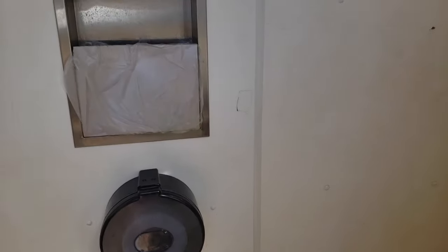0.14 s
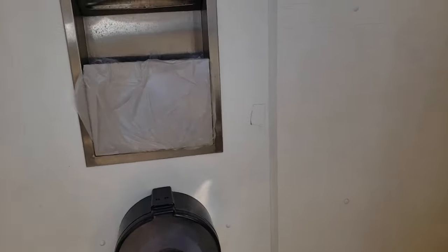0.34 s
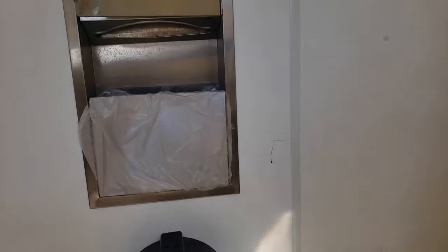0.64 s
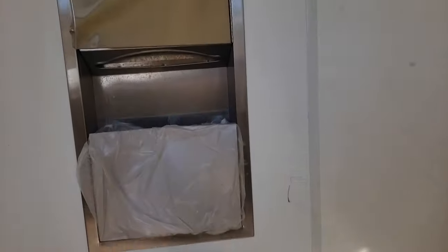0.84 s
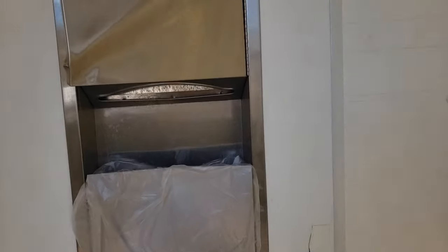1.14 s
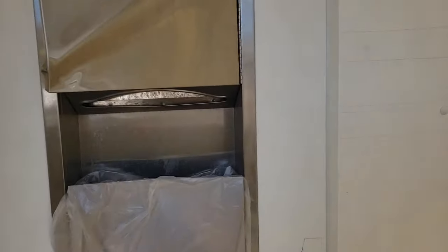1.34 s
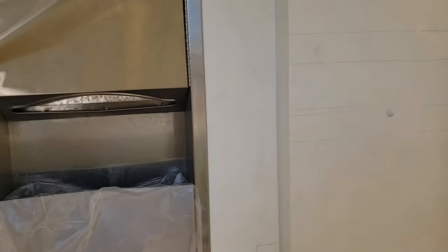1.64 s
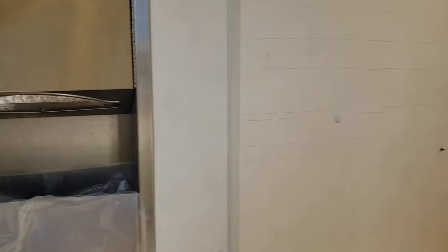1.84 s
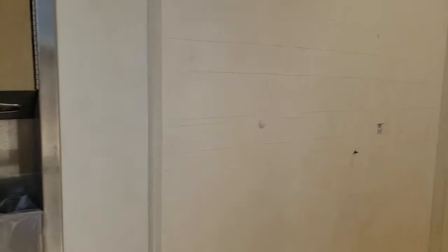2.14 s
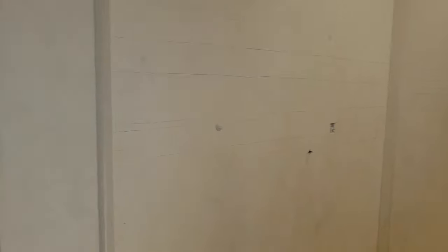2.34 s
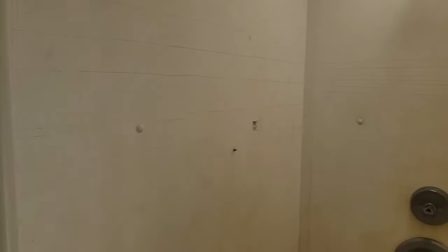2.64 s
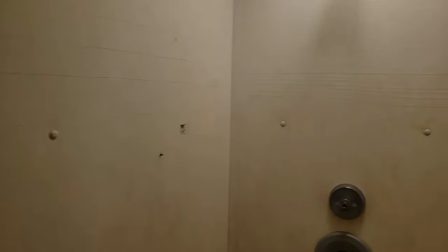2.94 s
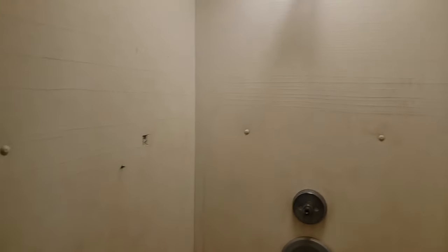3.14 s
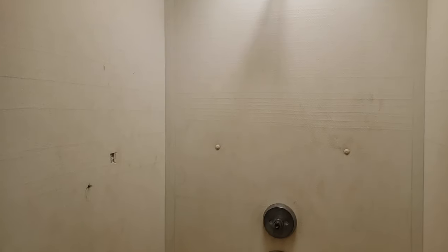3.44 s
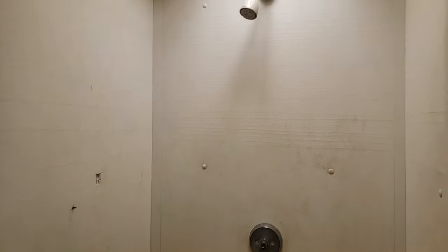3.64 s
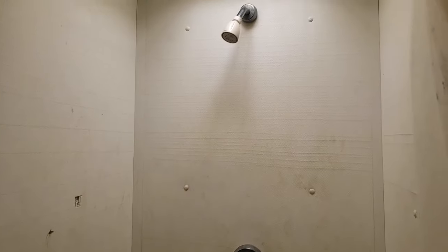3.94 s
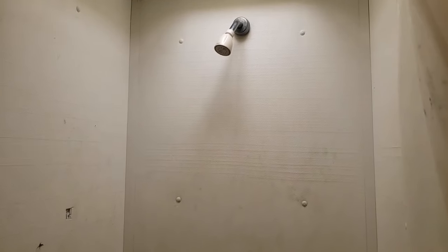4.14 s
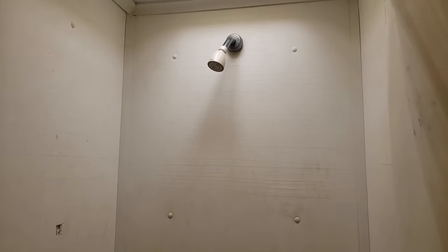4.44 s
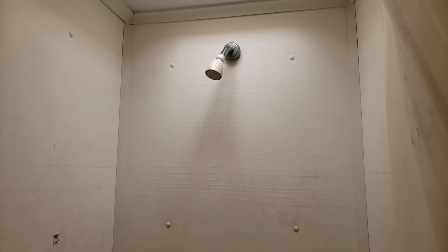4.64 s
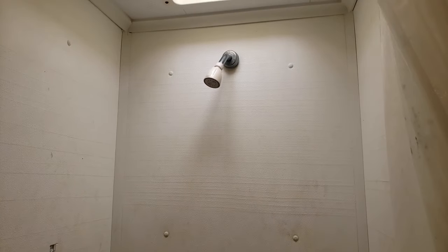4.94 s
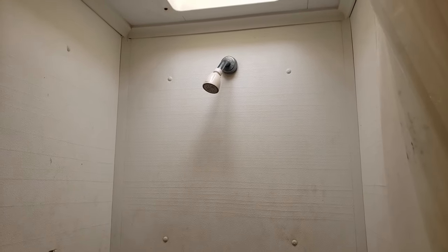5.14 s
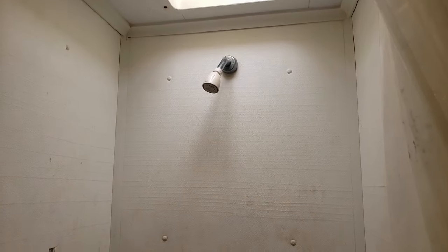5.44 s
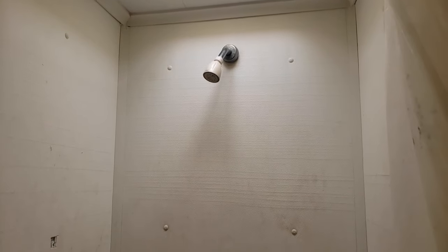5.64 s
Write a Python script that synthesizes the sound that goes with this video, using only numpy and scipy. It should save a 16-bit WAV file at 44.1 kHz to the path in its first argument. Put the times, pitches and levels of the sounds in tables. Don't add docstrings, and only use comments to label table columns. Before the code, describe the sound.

Low fan hum in a small washroom, a few bumps and footsteps, then a plastic curtain rattles aside and thuds against a hollow wall.

```python
import sys
import numpy as np
from scipy import signal
from scipy.io import wavfile
from scipy.ndimage import uniform_filter1d

SR = 44100
rng = np.random.default_rng(int(sys.argv[2]) if len(sys.argv) > 2 else 0)


def volts_from_decibels(level):
    exponent = np.asarray(level, float) / 20
    return 10 ** exponent


def to_wav(s):
    ch = np.atleast_2d(s).T
    pcm = np.round(np.clip(ch, -1, 1) * 32767)
    wavfile.write(sys.argv[1], SR, pcm.astype(np.int16))


N = 255780
TIME = np.arange(N) / SR
KNOCK_S = 2.989

# (f/Hz, likeness -1 to 1)
LIKENESS = [(60, 1), (99, 0.93), (160, 0.97), (270, 0.92), (450, 0.61), (740, 0.54), (1220, -0.57),
            (2010, -0.12), (3330, 0.026), (5500, 0.18), (9080, -0.12), (15000, 0.13)]
# (t/s, effort/dB)
PULL = [
    (2.44, -66),
    (2.5, -53),
    (2.636, -54.5),
    (2.724, -51),
    (2.86, -51),
    (2.944, -55.5),
    (3.034, -46.5),
    (3.138, -61),
    (3.3, -67.5),
]
# (t/s, peak level/dB, low ring f/Hz, high ring level/dB, tick level/dB)
CLACKS = [(2.2744, -53.5, 1850, -27, -25), (2.459, -59, 2010, -9, 4), (2.5534, -39, 2480, -32, -20),
          (2.589, -46, 2800, 6, -23), (2.607, -35, 2270, 3.5, -17), (2.6547, -27, 2540, -7.5, -39),
          (2.7086, -38, 1780, -22, -36), (2.74, -26.5, 2320, -0.5, -41), (2.77, -39, 2980, -30, -32),
          (2.8152, -29, 2500, 1.5, -16.5), (2.846, -29.5, 2530, -27, -35), (2.9247, -39, 2340, -36, -28),
          (2.9481, -39.5, 2370, -38, -37), (2.9689, -41, 2490, -6, -35), (2.982, -31, 1970, 3, -14.5),
          (2.9918, -35, 1940, -1, -3.5), (3.0042, -26, 1810, -3.5, -18)]


def evened(x):
    return x / np.sqrt(np.mean(x ** 2) + 1e-20)


def read(points, hz):
    f, value = np.transpose(points)
    return np.interp(np.log(hz + 1), np.log(f + 1), value)


def level(rows):
    return np.interp(TIME, *np.transpose(rows))


def add(mix, s, sound):
    part = mix[:, round(s * SR):][:, :sound.shape[1]]
    part += sound[:, :part.shape[1]]


def partner(left, other, same):
    return np.array([left, same * left + np.sqrt(1 - same ** 2) * other])


def diffuse(gain, patchy_db, flicker_db, size=512):
    # (f/Hz, left over right level/dB)
    balance = [(60, 2.5), (180, 1), (550, 1.2), (1200, -0.6), (3000, 6.5), (5000, 12), (9000, 2.5),
               (15000, -2.5)]
    hop = size // 4
    hz = np.fft.rfftfreq(size, 1 / SR)
    a, b, c, d, patches = rng.standard_normal((N // hop + 5, len(hz), 5)).T
    flicker = evened(uniform_filter1d(patches[:40].sum(0), size=4))
    patches = uniform_filter1d(patches, size=8, axis=0)
    patches = evened(uniform_filter1d(patches, size=16, axis=1))
    same = np.clip(read(LIKENESS, hz), -1, 1)[:, None]
    z = partner(a + 1j * b, c + 1j * d, same)
    z = z * volts_from_decibels(read(balance, hz)[:, None] * np.array([.5, -.5])[:, None, None])
    z = z * gain(hz)[:, None] * volts_from_decibels(patchy_db * patches + flicker_db * flicker)
    return evened(signal.istft(z, nperseg=size, noverlap=size - hop)[1][:, :N])


def ring(hz, t60, rise, size=12000):
    t = np.arange(size) / SR
    return volts_from_decibels(-60 * t / t60) * (1 - np.exp(-t / rise)) * np.sin(2 * np.pi * hz * t)


def burst(lo_hz, hi_hz, t60, size=12000):
    band = signal.butter(2, [lo_hz, min(hi_hz, SR / 2.2)], "bandpass", fs=SR, output="sos")
    left, other = signal.sosfilt(band, rng.standard_normal((2, size)))
    same = np.clip(read(LIKENESS, np.sqrt(lo_hz * hi_hz)), -1, 1)
    puff = partner(left, other, same)
    return evened(puff) * volts_from_decibels(-60 * np.arange(size) / SR / max(t60, .002))


def ports(sound, pan_db, lag):
    left = volts_from_decibels(pan_db / 2) * np.roll(sound, max(lag, 0))
    right = volts_from_decibels(-pan_db / 2) * np.roll(sound, max(-lag, 0))
    return np.array([left, right])


def fan():
    # (f/Hz, level/dB)
    air = [(12, -63), (20, -13), (91, -2), (123, -2.5), (172, -5), (198, -16), (337, -12.5), (499, -25),
           (678, -25.5), (759, -20), (1030, -55.5), (2820, -48), (5680, -39.5), (7310, -66.5), (16000, -51)]
    # (f/Hz, width/Hz)
    fan_modes = [(48, 10), (168, 12.3), (772, 48)]
    # (f/Hz, width/Hz, level/dB)
    steady_modes = [(125.3, 42, -15.5), (85, 15, -10.5), (339.7, 24.3, -16), (2700, 160, -48)]
    # (t/s, place: 0 door, 1 basin, 2 alcove)
    walk = [
        (0, 0),
        (.55, 0.12),
        (1.0, 1),
        (2.0, 1.05),
        (3.0, 1.6),
        (3.5, 1.75),
        (5.8, 1.9),
    ]
    # (door level/dB, basin level/dB, alcove level/dB)
    rumble_db = (-53.5, -48.5, -56)
    low_mode_db = (-44.5, -47.5, -52.5)
    alcove_mode_db = (-80, -69.5, -58.5)
    hum_db = (-69, -45, -44.5)
    place = level(walk)

    def modes(rows):
        def gain(f):
            return sum(volts_from_decibels(db) / (1 + (2 * (f - hz) / width) ** 2) for hz, width, db in rows)
        return diffuse(gain, 0, 0, size=8192)

    def heard(tone_db):
        return volts_from_decibels(np.interp(place, np.arange(len(tone_db)), tone_db))

    out = volts_from_decibels(-46) * diffuse(lambda f: volts_from_decibels(read(air, f)), 1.0, 0.29, size=2048)
    out += volts_from_decibels(-52.5) * modes(steady_modes)
    out += heard(hum_db) * np.sin(2 * np.pi * 120 * TIME)
    out += volts_from_decibels(-2) * heard(low_mode_db) * np.sin(2 * np.pi * fan_modes[1][0] * TIME)
    for tone_db, (hz, width) in zip((rumble_db, low_mode_db, alcove_mode_db), fan_modes):
        out += heard(tone_db) * modes([(hz, width, 0)])
    return out


def sung(spectrum, hz):
    # (f/Hz, width/Hz, lift level/dB)
    rod = [(2535, 500, 5), (4170, 300, 2), (738, 28, 4.5)]
    lift = sum(db / (1 + (2 * (hz - f) / width) ** 2) for f, width, db in rod)
    return volts_from_decibels(read(spectrum, hz) + lift)


def slips():
    slips_per_s, slip_db, fade_s = 200, 3, .004
    sliding = (TIME > PULL[0][0]) * (TIME < KNOCK_S)
    jolts = rng.exponential(1, N) * (rng.random(N) < slips_per_s / SR) * sliding
    jumps = signal.lfilter([1], [1, -np.exp(-1 / (fade_s * SR))], jolts)
    return volts_from_decibels(slip_db * np.minimum(jumps, 3))


def slack():
    slack_db, slack_s, hard_db = -1, 0.055, -33
    before = np.zeros(N)
    for s, db, *_ in CLACKS:
        if db > hard_db and s < KNOCK_S:
            before += np.clip(1 - (s - TIME) / slack_s, 0, 1) ** .5 * (TIME < s)
    return volts_from_decibels(slack_db * np.minimum(before, 1))


def creases():
    # (t/s, level/dB, length/s, fizz level/dB)
    folds = [
        (0.488, -65.5, 0.076, 1.5),
        (1.014, -67.5, 0.046, 12.5),
        (1.79, -68, .05, -3),
        (1.95, -66, 0.42, -14),
        (4.555, -69.5, 0.15, -8.5),
        (5.195, -70.5, 0.099, -15),
        (5.592, -69.5, .3, -25),
        (5.79, -61, .03, -10),
    ]
    rise_s, sag_db = 0.0097, -1.5
    out = np.zeros((2, N))
    for s, db, length, fizz_db in folds:
        shape = np.clip(np.minimum(TIME - s, s + length - TIME) / rise_s + .5, 0, 1)
        sag = volts_from_decibels(db + sag_db * np.clip((TIME - s) / length, 0, 1))
        out += shape * sag * volts_from_decibels(np.array([[0], [fizz_db]]))
    return out


def curtain():
    # (t/s, level/dB)
    stirring = [(0, -63.5), (.31, -70), (.485, -67.5), (.6, -65), (.72, -64.5), (.8, -61), (1.05, -61),
                (1.27, -63.5), (1.42, -69), (1.7, -69), (2.0, -67), (2.27, -64.5), (2.4, -63),
                (3.36, -66.5), (3.85, -70), (3.92, -77), (4.5, -77.5), (5.8, -74)]
    # (f/Hz, level/dB)
    swish_colour = [(590, -24), (1000, 9.5), (1200, -9), (1370, -1), (2560, -3), (3290, -2), (3920, -2.5),
                    (4350, -5.5), (7020, -2.5), (8000, -92), (10400, -83.5), (17600, -120)]
    fizz_colour = [(6800, -13.5), (7600, -8.5), (8400, -19), (9200, -10), (10300, -7), (12300, -4),
                   (15100, -12.5), (16000, -42)]
    body_colour = [(210, -8), (350, -8), (383, -9), (705, -9.5), (791, -3.5), (1060, -10), (1500, -13),
                   (1950, -24.5), (3300, -120)]
    stir_mid_db, pull_mid_db = -66.5, -50.5
    stir = level(stirring) - stir_mid_db
    pull = level(PULL) - pull_mid_db
    pulling = (TIME > PULL[0][0]) * (TIME < PULL[-1][0])

    def gain(stir_db, stir_slope, pull_db, pull_slope):
        stirred = volts_from_decibels(stir_mid_db + stir_db + stir_slope * stir)
        pulled = pulling * volts_from_decibels(pull_mid_db + pull_db + pull_slope * pull)
        return np.hypot(stirred, pulled)

    crease, crease_fizz = creases()
    swish = np.hypot(crease, gain(0, 0.88, 0, 1))
    fizz = np.hypot(crease_fizz, gain(-7, 1.98, -5, 0.55))
    body = np.hypot(volts_from_decibels(7.5) * crease, gain(1.5, 0.033, 6.5, 1.04))
    out = slips() * slack() * swish * diffuse(lambda f: sung(swish_colour, f), 1.2, .8)
    out += fizz * diffuse(lambda f: volts_from_decibels(read(fizz_colour, f)), .6, .8)
    return out + body * diffuse(lambda f: sung(body_colour, f), 1.0, 0.69)


def bumps():
    # (t/s, peak level/dB, f/Hz, t60/s)
    blows = [(.492, -28, 267, 0.029), (.497, -30.5, 510, 0.031), (.510, -53, 275, 0.035),
             (.494, -42.5, 812, 0.083), (.528, -50, 400, 0.025), (.90, -54.5, 900, .06),
             (1.562, -64, 507, .05), (1.643, -40, 482, 0.065), (1.646, -44, 1120, 0.062),
             (1.795, -38, 785, 0.054), (1.80, -39.5, 1400, 0.019), (1.806, -35, 880, 0.044),
             (1.839, -44.5, 930, 0.031), (2.991, -34, 608, 0.081), (2.995, -31, 340, 0.034),
             (3.004, -24.5, 723, 0.018), (3.033, -41, 1080, 0.033)]
    # (t/s, peak level/dB, f/Hz)
    grit = [(.494, -47, 2780), (0.495, -56.5, 5600), (.493, -55, 1200), (2.29, -58, 1750),
            (2.359, -57, 1700), (.528, -54, 1090), (0.899, -64, 1500), (1.643, -47.5, 1590),
            (1.646, -58, 2140), (1.794, -53.5, 5430), (1.80, -52.5, 4400), (1.84, -48.5, 1650),
            (2.991, -33, 2380), (2.995, -35, 1270), (3.005, -38, 5200), (3.032, -57, 2700)]
    # (t/s, peak level/dB, f/Hz, t60/s)
    narrow_puffs = [
        (0.498, -57, 2790, 0.14),
        (2.02, -68, 2570, .3),
        (2.745, -42, 4300, 0.25),
        (3.045, -47, 4350, 0.33),
        (3.09, -48, 2230, 0.069),
        (3.155, -51, 2200, 0.11),
        (4.555, -78, 9800, .2),
        (5.2, -78, 9500, 0.18),
    ]
    out = np.zeros((2, N))
    for s, db, hz, t60 in blows:
        blow = ports(ring(hz, 1.25 * t60, 0.00012), 0.46, lag=12)
        blow += volts_from_decibels(-3.5) * burst(0.55 * hz, 1.105 * hz, 2.37 * t60)
        add(out, s, volts_from_decibels(db) * blow)
    for s, db, hz in grit:
        add(out, s, volts_from_decibels(db) * burst(0.85 * hz, 1.145 * hz, 0.091))
    for s, db, hz, t60 in narrow_puffs:
        add(out, s, volts_from_decibels(db) * burst(.95 * hz, 1.05 * hz, t60))
    return out


def knock():
    # (t/s, level/dB, f/Hz, t60/s)
    thumps = [
        (.715, -31.5, 51.3, 0.27),
        (1.835, -27.5, 59, 0.14),
        (1.841, -18.5, 222, 0.033),
    ]
    # (f/Hz, level/dB, t60/s)
    wall = [(130, 15, 0.072), (96.4, -4.5, 0.44), (85, -26, 0.39), (50.2, -6, 0.4), (61.2, -12, 0.38),
            (155.5, -14, 0.2), (259.8, -9.5, 0.174)]
    out = np.zeros((2, N))
    for s, db, hz, t60 in thumps:
        add(out, s, volts_from_decibels(db) * ports(ring(hz, t60, 0.011), .4, lag=3))
    boom = -sum(volts_from_decibels(db) * ring(hz, t60, .014, size=30000) for hz, db, t60 in wall)
    add(out, KNOCK_S, volts_from_decibels(-17.5) * ports(boom, 1.0, lag=18))
    return out


def rings():
    out = np.zeros((2, N))
    for s, db, hz, high_db, tick_db in CLACKS:
        snap = ring(hz, 0.014, 0.00018)
        snap += volts_from_decibels(high_db + 4.5) * ring(2.04 * hz, 0.0023, 0.00023)
        snap += volts_from_decibels(-9.5) * burst(750, 4700, 0.011)[0]
        snap += volts_from_decibels(tick_db + 4) * burst(6000, 16000, .004)[0]
        clack = ports(snap, 1.5, lag=16)
        clack += volts_from_decibels(tick_db - 4.0) * burst(6500, 13400, 0.057)
        rattle_db = -9 - 0.37 * (db + 35)
        rattle = burst(750, 3540, 0.11) + volts_from_decibels(.5 * high_db) * burst(3400, 5420, 0.087)
        clack += volts_from_decibels(rattle_db) * rattle
        add(out, s, volts_from_decibels(db + 4.0) * clack)
    return out


def room(x):
    # (f/Hz, t60/s)
    echo_t60 = [(100, 0.72), (400, 0.24), (1000, 0.36), (3000, 0.54), (8000, 0.86), (16000, 0.13)]
    taps = np.zeros((2, SR // 2))
    at = np.arange(100, SR // 2 - 20, 20) + rng.integers(0, 20, (2, (SR // 2 - 101) // 20))
    np.put_along_axis(taps, at, rng.choice([-1., 1.], at.shape), 1)
    hz, t, z = signal.stft(taps, SR, nperseg=256)
    fade = volts_from_decibels(-60 * t / read(echo_t60, hz)[:, None])
    tail = signal.istft(z * fade, SR, nperseg=256)[1]
    tail = tail / np.linalg.norm(tail[0])
    return signal.fftconvolve(x.mean(0)[None], tail, axes=1)[:, :N]


def scene():
    blows, clacks = bumps(), rings()
    echoes = room(volts_from_decibels(-5.5) * clacks + volts_from_decibels(-3.5) * blows)
    return fan() + curtain() + blows + knock() + clacks + echoes


def top_cut(x):
    return signal.sosfilt(signal.butter(12, 16530, fs=SR, output="sos"), x)


def record(dry):
    edge = signal.firwin(511, 15800, window=("kaiser", 9), fs=SR)
    mix = signal.oaconvolve(dry, edge[None], "same")
    return top_cut(mix)


dry = scene()
out = record(dry)
to_wav(out)
```